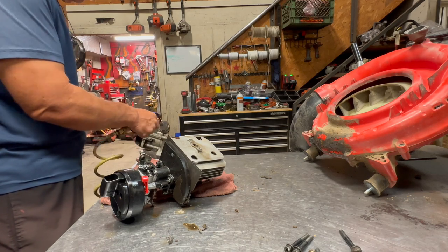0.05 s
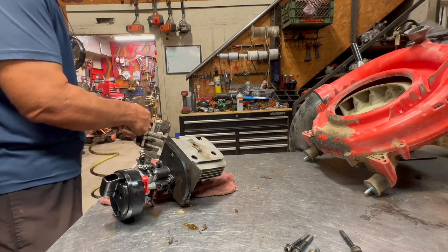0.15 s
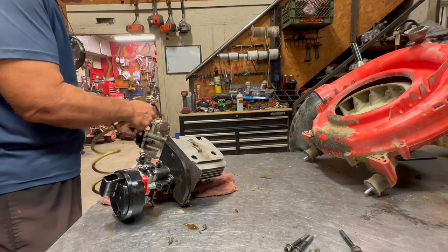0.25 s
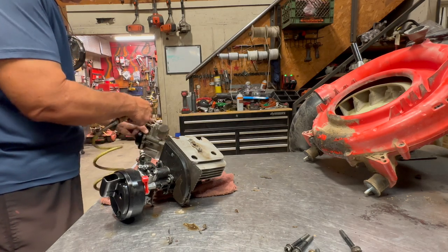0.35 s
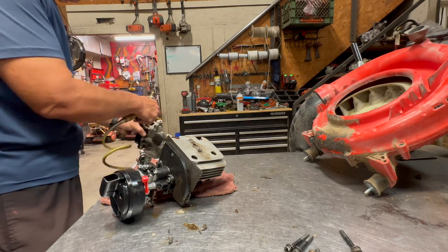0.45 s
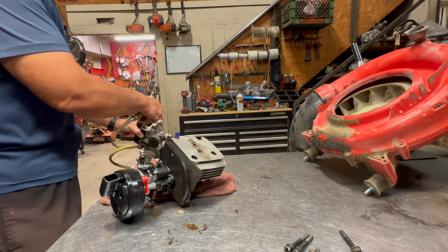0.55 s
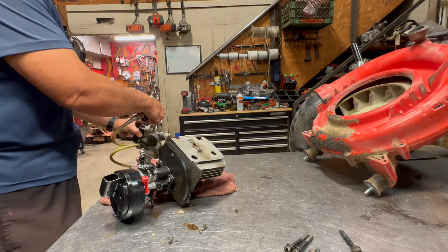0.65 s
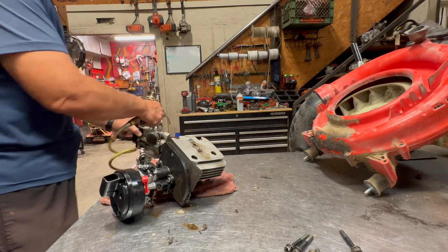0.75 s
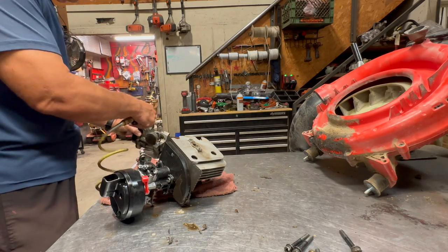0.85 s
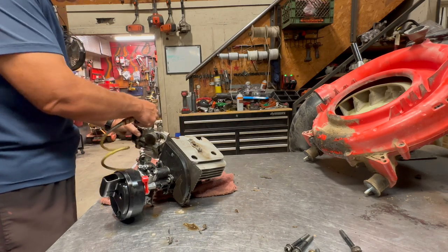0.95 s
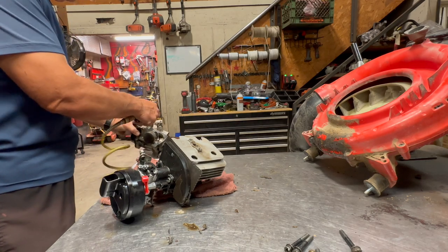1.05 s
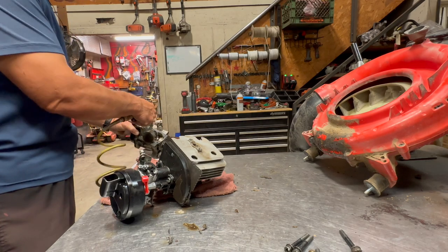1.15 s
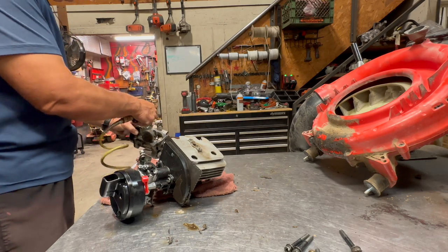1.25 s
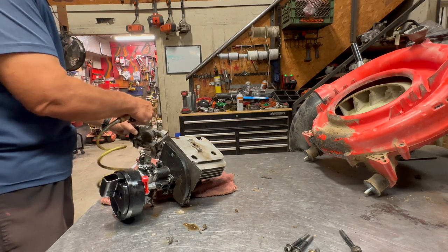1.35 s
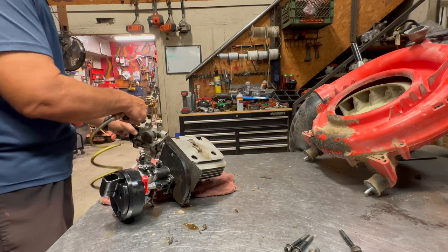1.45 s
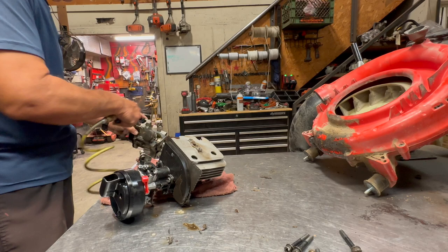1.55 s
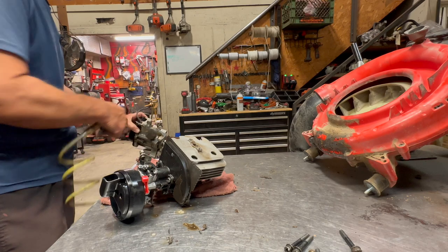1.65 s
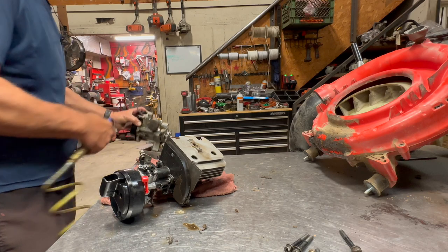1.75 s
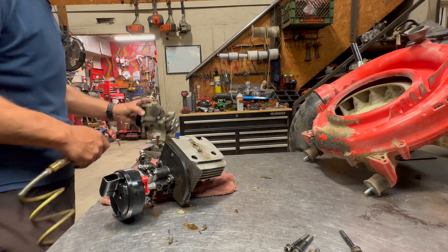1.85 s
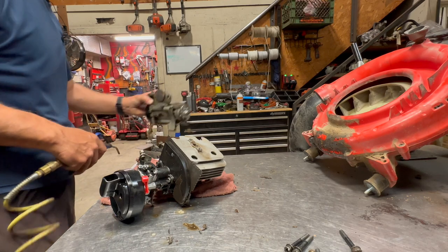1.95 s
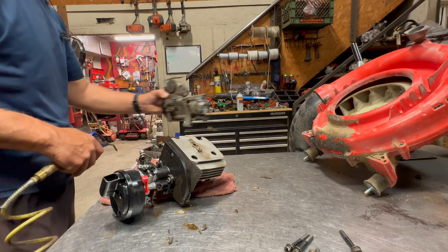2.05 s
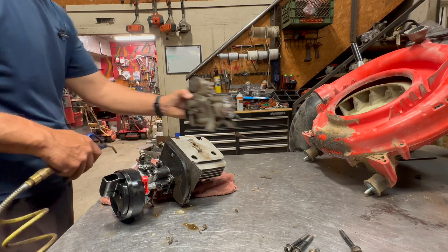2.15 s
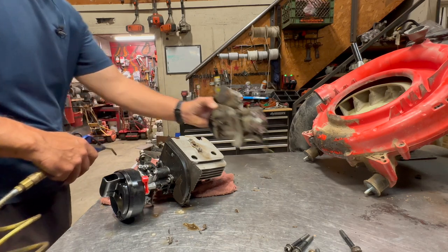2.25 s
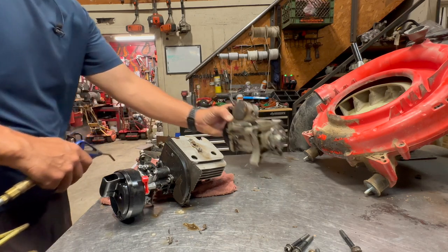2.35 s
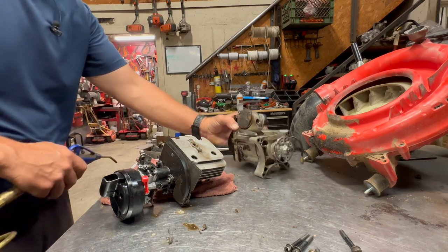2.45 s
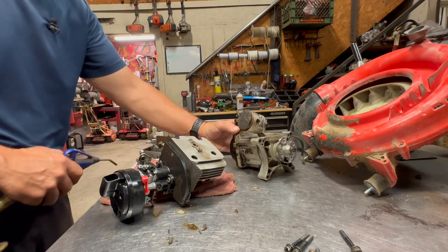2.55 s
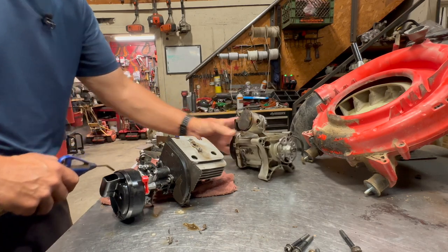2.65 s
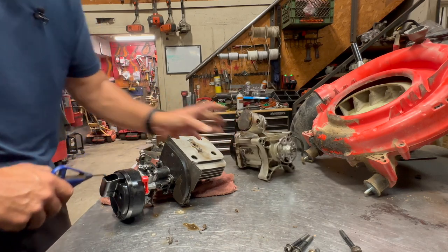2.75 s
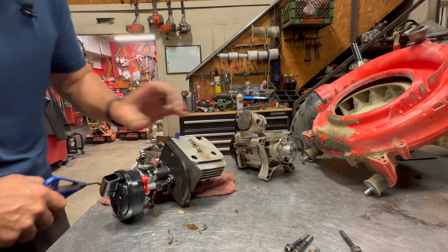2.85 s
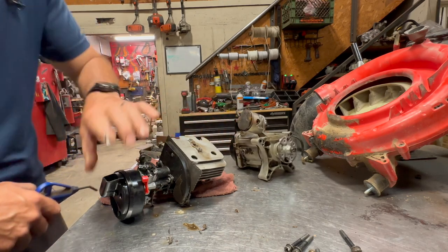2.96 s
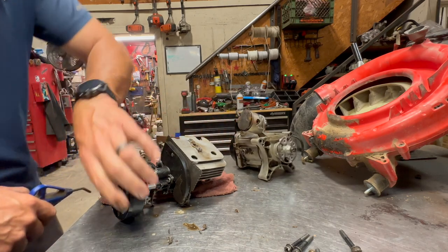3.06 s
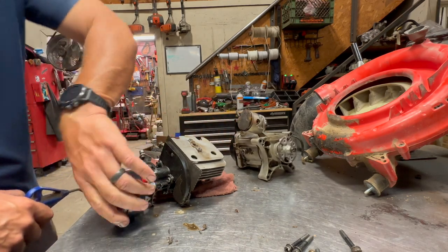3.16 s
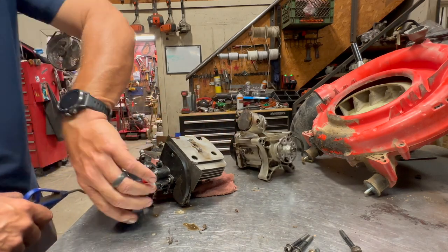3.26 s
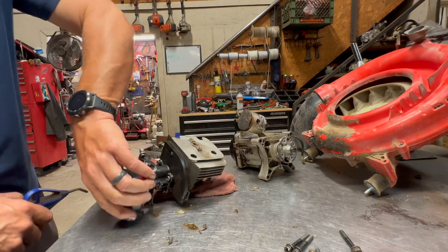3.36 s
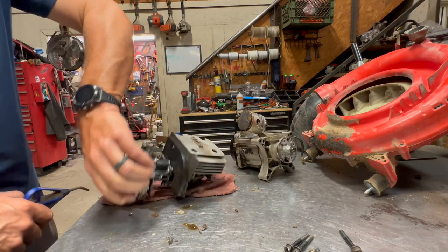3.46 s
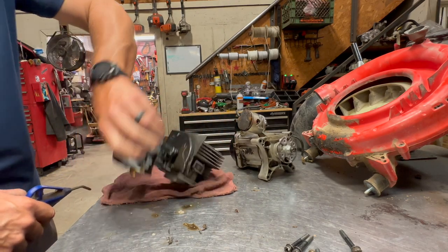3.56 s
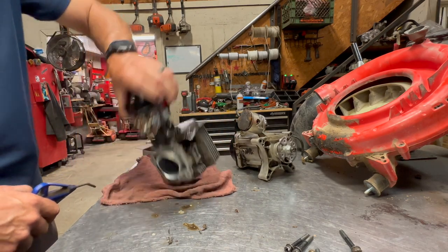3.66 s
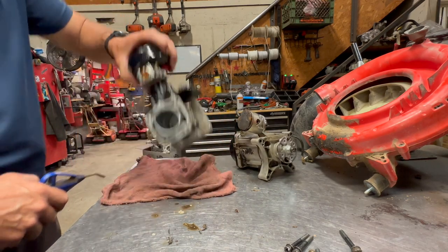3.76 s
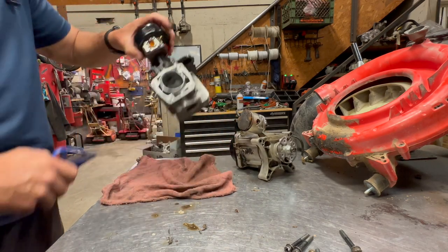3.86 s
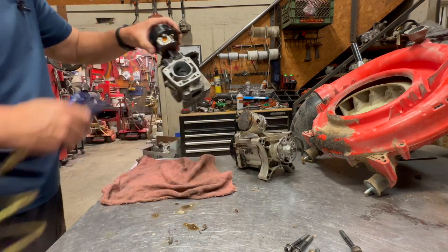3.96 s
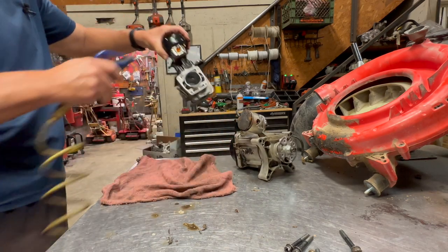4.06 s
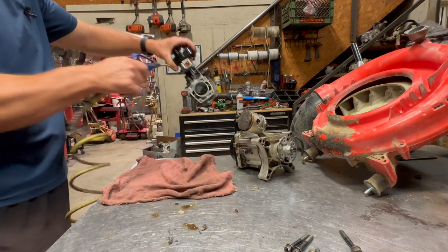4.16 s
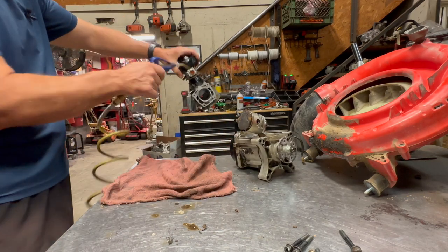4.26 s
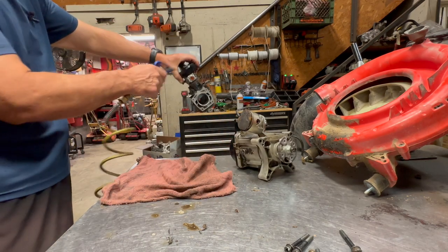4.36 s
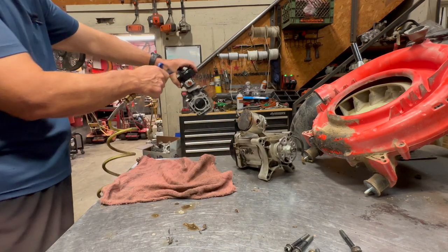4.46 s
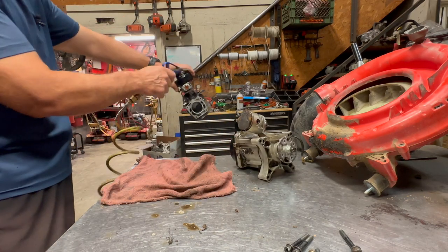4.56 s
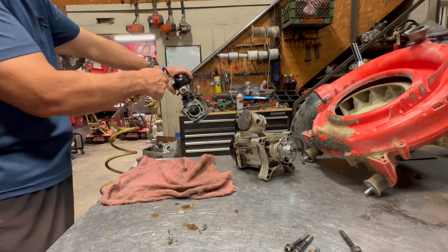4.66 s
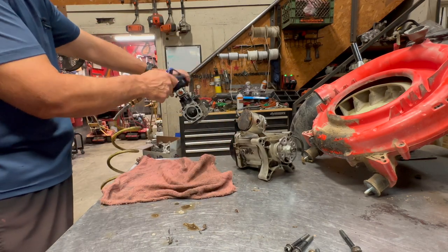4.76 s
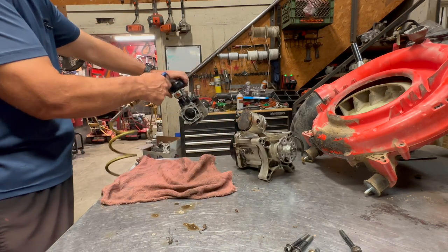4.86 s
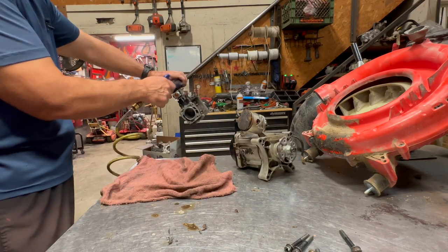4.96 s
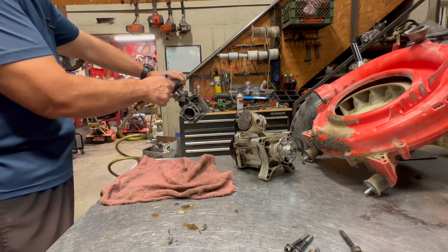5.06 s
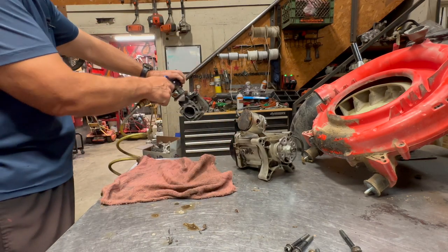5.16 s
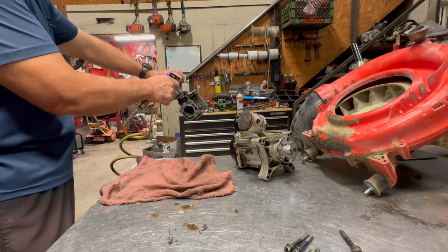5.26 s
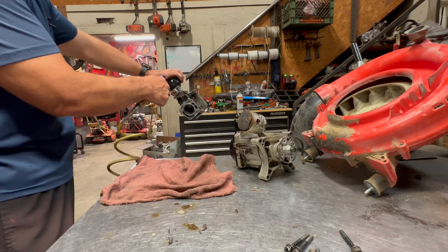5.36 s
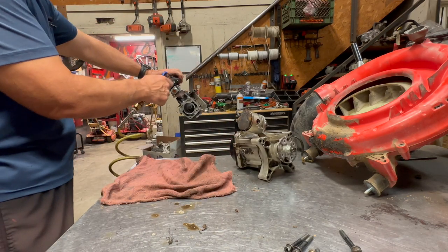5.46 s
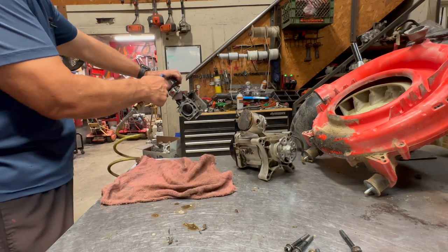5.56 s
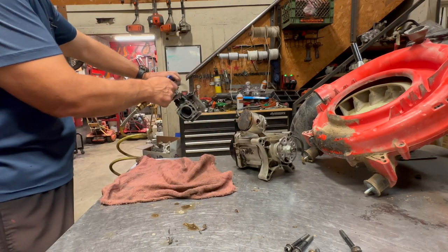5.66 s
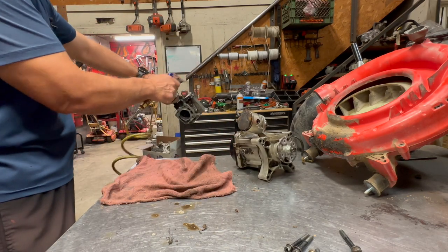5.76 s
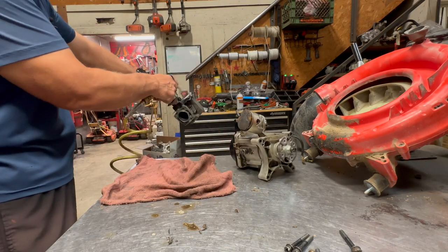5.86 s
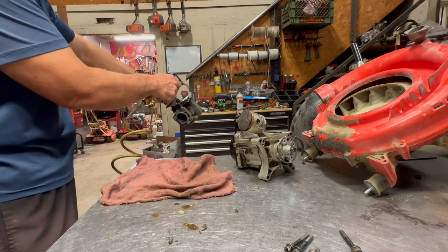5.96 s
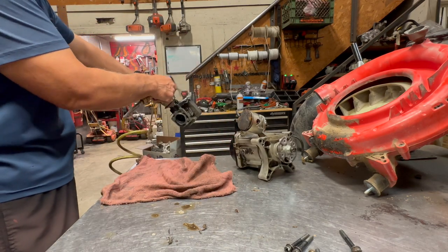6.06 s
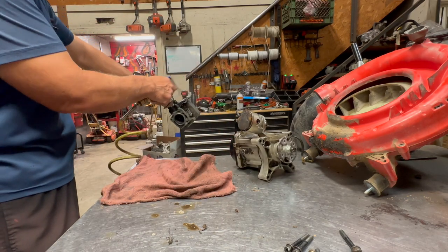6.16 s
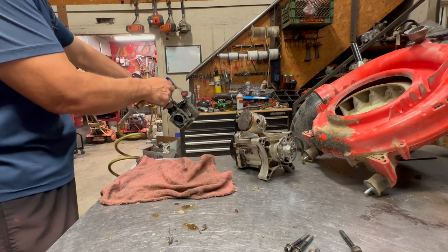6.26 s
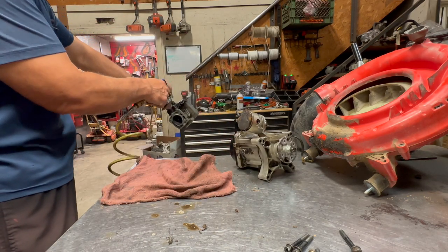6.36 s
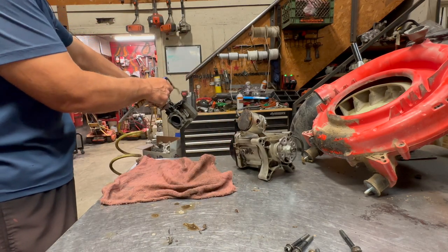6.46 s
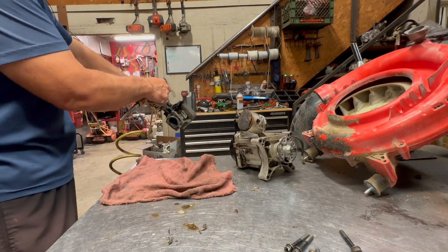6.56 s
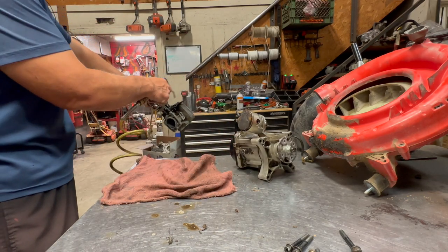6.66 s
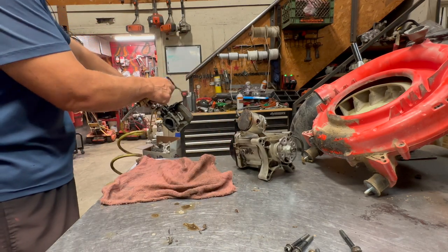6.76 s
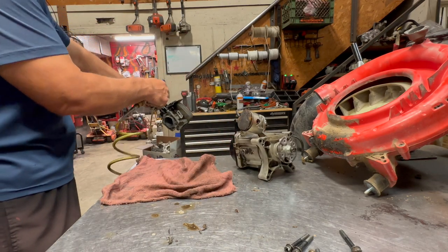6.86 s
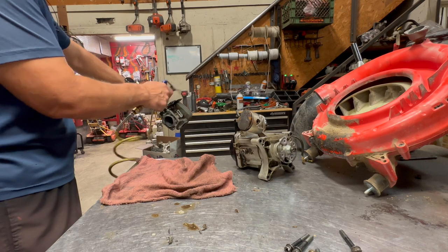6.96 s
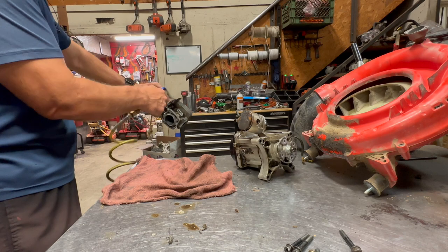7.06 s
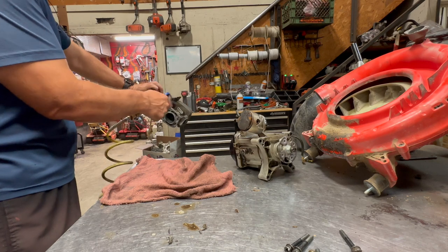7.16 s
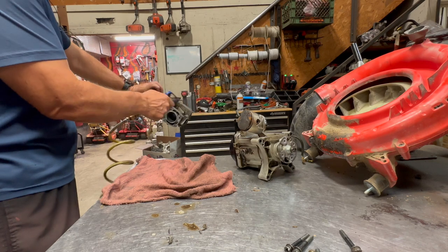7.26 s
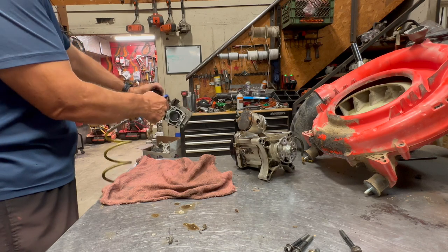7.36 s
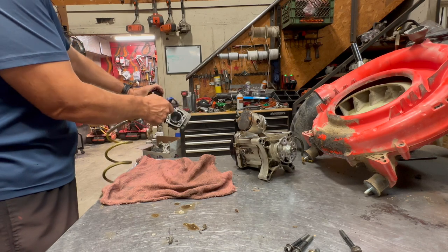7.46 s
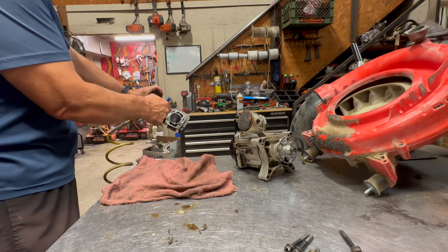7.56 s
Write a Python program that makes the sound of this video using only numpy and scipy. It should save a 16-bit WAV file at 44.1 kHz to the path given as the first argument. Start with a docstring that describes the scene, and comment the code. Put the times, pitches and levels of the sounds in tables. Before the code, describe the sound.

A harsh, bright compressed-air blast is already on at 0 seconds, close and loud enough to overload the mono microphone. The jet is led slowly over a metal engine part, hissing on edges, dipping briefly near 0.3, roaring in hollows and catching short breathy notes. At 1.7 the gun's valve snaps shut with a small hollow tick, and a short workshop echo fades. A quiet piston compressor throbs and hums beneath soft room rush, its drone swelling slightly around 2.4 to 4. At about 2.46 a heavy casting knocks onto a steel bench: a quick cluster of dull, clanking contacts with brief ringing, a fainter last tap near 2.7. At 4.18 the second blast bursts on, swinging to and fro roughly six times a second, roar alternating with ringing hiss. A rim sings pulsingly around 6, and breathy notes dot the blast, which continues to the end at about 7.6.

```python
"""A compressed-air blow gun dries two engine parts in a workshop, over a compressor's throb and the room's rush.
The first blast is already on: shaped noise hisses, rings on edges and roars in hollows as the jet is led slowly
over the part. The gun's valve snaps shut with a tick; then the part knocks onto a steel bench, made of fading
bench tones and noise. In the second blast, which lasts to the end, the jet swings quickly to and fro: roar and
ring take turns and a rim sings. Short breathy notes dot both blasts, which overload the mono microphone."""
import sys
import numpy as np
from scipy import signal
from scipy.fft import rfft, irfft, next_fast_len
from scipy.io import wavfile
from scipy.ndimage import uniform_filter1d, map_coordinates

SR = 44100
rng = np.random.default_rng(int(sys.argv[2]) if len(sys.argv) > 2 else 0)


def transcribe(u):
    """Save the signal u as a 16-bit wav file named by the first command-line argument.

    u: samples, shape (n,) or (channels, n), limited to [-1, 1]; the rate is SR.
    q: integer samples, one column per channel.
    """
    v = np.clip(np.atleast_2d(u).T, -1, 1)
    q = np.round(v * 32767).astype(np.int16)
    wavfile.write(sys.argv[1], SR, q)


N = 335601  # length of the scene [samples]

# Levels in the tables are relative: the functions scale them further.
# rush of the room: (frequency [Hz], level per Hz [dB])
ROOM_RUSH = [(20, 0), (48, -1), (64, 2), (130, -1), (180, -3), (300, 0), (700, -6), (2200, -8),
             (3400, -9.5), (4300, -11), (5600, -12), (6300, -19), (10700, -27), (11600, -30.5),
             (15500, -37)]
# how long the workshop's echo lasts: (frequency [Hz], time to fade by 60 dB [s])
ROOM_FADE = [(200, .4), (2000, .42), (6000, .38), (14000, .27)]
# compressor intake: (time [s], drone [dB], throb once a turn [dB], throb twice a turn [dB])
INTAKE_LEVELS = [(1.2, -42, -2, -14), (1.9, -42, -4, -8), (2.15, -40, -1, -10), (2.35, -35, -4, -11),
                 (2.85, -33, -8, -16), (3.25, -35, -13, -5), (4.1, -36.5, -9, -5.5), (4.4, -44.5, -14, -9)]
# the pump's other tones: (multiple of the shaft rate [1], level [dB])
SHAFT_TONES = [(4, -51), (8, -56.5), (13, -57), (14, -50), (15, -53), (22, -62), (29, -51), (31, -58),
               (36, -52.5), (38, -53), (39, -52.5), (54, -56.5), (58, -56.5), (93, -53), (95, -53),
               (103, -56), (111, -58.5), (113, -53), (170, -54)]
# hum of the motor: (frequency [Hz], level [dB])
MOTOR_HUM = [(119.8, -52), (239.7, -65)]
# colour of the valve chatter: (frequency [Hz], full width at half height [Hz], level [dB])
VALVE_BANDS = [(630, 130, 1), (1560, 210, 11.5), (1830, 200, 3), (2760, 120, 12), (3320, 450, 4),
               (10550, 700, -15)]
# the casting lands, rocks on the bench and settles as it is let go:
# (time [s], level [dB], extra level of the crack [dB])
BENCH_CONTACTS = [(2.4614, -4, -2), (2.4716, -9.5, 1), (2.4973, -9.5, -4), (2.505, -19, -2),
                  (2.514, -21.5, 2), (2.527, -18, -11), (2.5574, -16.5, -4), (2.688, -31, -6)]
# ringing of bench top and casting: (frequency [Hz], level [dB], time to fade by 60 dB [s])
BENCH_TONES = [(172, -12, 0.28), (236, -1.5, 0.26), (320, -9, 0.13), (399, -5.5, 0.32), (450, -7, 0.26),
               (582, 5, .11), (732, -7, .18), (840, -7, .13), (930, 0, .11), (1014, -6, .14),
               (1060, -1, 0.091), (1255, -10, .12), (1572, -11, .16), (2010, 0, 0.056), (2330, -1.5, 0.089),
               (2697, -24, 0.11)]
# dull part of a contact: (frequency [Hz], level per Hz [dB])
THUD_COLOUR = [(40, -25), (130, -16), (250, 2), (600, 4), (1100, 0.5), (1800, -14), (4000, -45)]
# bright part of a contact: (frequency [Hz], level per Hz [dB])
CRACK_COLOUR = [(300, -28), (1200, 1.5), (2800, 1), (4000, -8.5), (6500, -17), (8500, -24), (15500, -34)]
# tones of the valve snapping shut: (frequency [Hz], level [dB], time to fade by 60 dB [s])
POP_TONES = [(1280, -1, .012), (1720, -1, .014)]
# openings and edges the jet can sound: name: (frequency [Hz], half width at half height [Hz])
OPENING_NOTES = {"throat": (1090, 150), "passage": (3380, 180), "slit": (6330, 290), "lip": (14150, 1300),
                 "bore": (890, 126), "port": (1720, 260), "recess": (2310, 510), "fins": (3900, 290)}
# the jet briefly catches one of them: (time [s], length [s], opening [name], level [dB])
CATCH_TIMES = [(.28, .043, "lip", -17), (0.44, 0.064, "throat", -11), (0.49, 0.038, "throat", -6.5),
               (0.604, .06, "passage", -12), (.728, .059, "passage", -15), (0.92, .057, "throat", -9),
               (.975, 0.071, "passage", -10), (1.27, .091, "lip", -12), (1.392, .045, "passage", -8),
               (1.50, .033, "slit", -10), (1.532, 0.051, "throat", -13), (4.209, .043, "recess", -9),
               (4.258, 0.076, "bore", -10.5), (4.322, 0.032, "fins", -9), (4.353, 0.042, "lip", -7),
               (4.5, 0.081, "fins", -9.5), (4.528, 0.029, "port", -13.5), (4.606, .067, "port", -15.5),
               (5.992, 0.054, "recess", -13), (6.82, 0.078, "recess", -11), (6.99, 0.15, "recess", -13),
               (7.121, 0.076, "bore", -18.5), (7.19, 0.027, "fins", -13), (7.294, 0.028, "fins", -9),
               (7.405, 0.071, "slit", -14), (7.527, 0.029, "bore", -10.5)]
# the second part's rim, grazed at the far end of each swing:
# (frequency [Hz], half width at half height [Hz])
RIM_NOTE = (4920, 450)
# the swings come closest to the rim: (time [s], length [s], level [dB])
RIM_APPROACH = (6.07, 1.03, -11.5)
# when the trigger is held for the first part: (opens [s], closes [s])
FIRST_HOLD = (-.02, 1.702)
# when the trigger is held for the second part: (opens [s], closes [s])
SECOND_HOLD = (4.176, 8)
# air in the first part's hollows: (frequency [Hz], level per Hz [dB])
FIRST_HOLLOW_COLOUR = [(40, -9), (200, -15), (650, -6), (920, -3), (1080, 0.5), (1350, -1), (1750, -9),
                       (2100, -3), (2800, -4), (3350, 3), (3950, -2.5), (4600, -2), (6200, -35),
                       (15000, -42)]
# air on the first part's edges: (frequency [Hz], level per Hz [dB])
FIRST_EDGE_COLOUR = [(40, -17), (500, -7), (1000, -40), (1750, -4), (2300, -9.5), (3400, 2.5), (4100, -6.5),
                     (4900, 5.5), (5450, -2.5), (6250, 5.5), (7000, -5), (7550, 1.5), (10500, -8),
                     (15500, -22)]
# free air around the first part: (frequency [Hz], level per Hz [dB])
FIRST_JET_COLOUR = [(40, -22), (1000, -4.5), (4200, -17.5), (4850, -5), (5600, -4.5), (6400, 3), (7000, -1),
                    (7600, 2.5), (10000, -1), (15500, 0.5)]
# air in the second part's hollows: (frequency [Hz], level per Hz [dB])
SECOND_HOLLOW_COLOUR = [(40, -23), (200, -11.5), (500, -3.5), (900, 1.5), (1200, -1.5), (2250, 1.5),
                        (3200, -1.5), (3750, 5), (4300, -5), (4900, -17), (15000, -15.5)]
# air on the second part's edges: (frequency [Hz], level per Hz [dB])
SECOND_EDGE_COLOUR = [(40, -12), (900, -17), (1800, -11.5), (2400, -6.5), (2800, -7), (3200, 3),
                      (3750, 1.5), (4150, -8.5), (4600, 1.5), (5150, -1), (5800, -8.5), (6500, -5.5),
                      (8000, -10), (15500, -33)]
# free air around the second part: (frequency [Hz], level per Hz [dB])
SECOND_JET_COLOUR = [(40, -6), (1100, -10), (1650, -2), (2400, -28), (3200, -19.5), (4000, -22), (4600, 1),
                     (6000, -1), (6550, 0), (7200, -3.5), (9000, -0.5), (11300, 3), (12800, 2.5),
                     (15500, 0.5)]
# how squarely the jet lies on the first part: (time [s], level [dB])
FIRST_AIM_LEVELS = [(0.0, -0.5), (.23, -0.5), (.288, -10), (.325, 1.5), (.9, 1.5), (1.12, -1.5), (1.27, -3),
                    (1.4, 0), (1.53, -0.5), (1.68, -9.5)]
# the nozzle passes over a hollow of the first part: (time [s], length [s], level [dB])
HOLLOW_PASSES = [(0.244, 0.016, -14), (0.324, 0.017, -11), (0.455, 0.069, -6), (0.603, 0.076, -10),
                 (.752, 0.037, -10), (0.814, 0.048, -9), (0.942, .08, -8), (1.404, 0.053, -8),
                 (1.524, 0.032, -11.5)]
# the middle of the swing drifts over the second part:
# (time [s], air in the hollows [dB], air on the edges [dB])
SECOND_AIM_LEVELS = [(4.2, -10, -20), (4.44, -13, -15), (4.8, -18, -17.5), (5.25, -16, -11.5),
                     (5.5, -20.5, -14), (5.8, -17, -14.5), (6.1, -17.5, -13), (6.5, -20.5, -9.5),
                     (6.9, -12.5, -11.5), (7.25, -16, -13.5), (7.6, -15, -9)]
# width of the swing, as the rise and fall of the roar: (time [s], change either way [dB])
SWING_WIDTH = [(4.2, 0), (4.6, 5), (4.8, 2.5), (5.2, 3.5), (5.7, 6), (6.1, 6), (6.45, 2.5), (6.8, 6),
               (7.2, 2.5), (7.5, 5)]
# the jet slips off the second part: (time [s], length [s], change on the casting [dB])
SLIP_TIMES = [(4.359, 0.039, -6), (7.243, 0.036, -7), (7.411, 0.054, -11), (7.572, 0.034, -12)]

PUMP_HZ = 16.49  # turns of the pump shaft per second
TOP_HZ = 15750  # nothing is kept above this
POP_S, POP_DB = 1.6983, -4  # the gun's valve snaps shut
# the hand swings the nozzle to and fro over the second part, slowly gaining speed
SWING_START_S, SWING_HZ, SWING_GAIN_HZ_PER_S = 4.26, 5.55, 0.24


def amp(db):
    """Turn decibels into gain."""
    return 10 ** (np.asarray(db) / 20)


def unit(x):
    """Scale to an average (rms) strength of 1."""
    return x / np.sqrt(np.mean(x ** 2) + 1e-20)


def clock():
    """Give the time of every sample in seconds."""
    return np.arange(N) / SR


def along(points, hz):
    """Read a curve of (frequency, value) points on a log frequency axis."""
    point_hz, values = np.transpose(points)
    return np.interp(np.log(hz + 1), np.log(point_hz), values)


def curves(rows):
    """Draw one value per sample for each column after the time."""
    times, *columns = np.transpose(rows)
    return [np.interp(clock(), times, column) for column in columns]


def wobble(rate):
    """Draw a smooth random curve through this many random points a second."""
    points = rng.standard_normal(int(N * rate / SR) + 4)
    return map_coordinates(points, [clock() * rate])


def swell(s, length):
    """Rise and fall smoothly around time s; length spans the points at 1/e of the peak."""
    return np.exp(-np.minimum((2 * (clock() - s) / length) ** 2, 60))


def filtered(x, response):
    """Shape the sound x by a response that depends on frequency."""
    size = next_fast_len(len(x) + 8192)
    hz = np.fft.rfftfreq(size, 1 / SR)
    return irfft(rfft(x, size) * response(hz), size)[:len(x)]


def noise(spectrum, size=N):
    """Make noise of a given colour, scaled to rms 1."""
    white = rng.standard_normal(size)
    return unit(filtered(white, lambda hz: amp(along(spectrum, hz))))


def resonance(f, hz, width):
    """Respond most strongly at one frequency, as a damped vibration does."""
    return 1j * f * width / (hz * hz - f * f + 1j * f * width)


def shop(x):
    """The workshop's echo is fading noise whose treble dies first."""
    hz, t, z = signal.stft(rng.standard_normal(SR // 2), SR, nperseg=256)
    fade = amp(-60 * t / along(ROOM_FADE, hz)[:, None])
    tail = signal.istft(z * fade, SR, nperseg=256)[1]
    delayed = np.pad(tail, (200, 0))  # the echo starts 200 samples late
    return signal.fftconvolve(x, delayed / np.linalg.norm(tail))[:N]


def compressor(valve_db=-45.0, stroke_db=0.5, waver_db=3.5):
    """A piston pump: a throbbing intake drone, shaft tones, valve chatter on each stroke and motor hum."""
    t = clock()
    turn = 2 * np.pi * (PUMP_HZ * t + 0.0034 * wobble(3))  # shaft angle, slightly unsteady

    def tone(phase):
        """A sine of rms 1 from a random starting point."""
        return np.sqrt(2) * np.sin(phase + rng.uniform(0, 2 * np.pi))

    drone_db, once_db, twice_db = curves(INTAKE_LEVELS)
    # neighbouring tones beat against the 18th, once and twice a turn
    throb = amp(once_db) * tone(19 * turn) + amp(twice_db) * tone(20 * turn)
    drone = amp(drone_db) * (tone(18 * turn) + throb)
    shaft = sum(amp(db + waver_db * wobble(4.35)) * tone(round(order) * turn) for order, db in SHAFT_TONES)

    def valve_colour(f):
        """The valves favour a few bands."""
        return sum(amp(db) * np.abs(resonance(f, hz, width)) ** 2 for hz, width, db in VALVE_BANDS)

    strokes = rng.standard_normal(N) * amp(stroke_db * np.cos(2 * turn))  # two strokes a turn
    chatter = filtered(strokes, valve_colour)
    hum = sum(amp(db) * tone(2 * np.pi * hz * t) for hz, db in MOTOR_HUM)
    return drone + shaft + amp(valve_db) * unit(chatter) + hum


def set_down(ring_db=-6, thud_t60=0.063, crack_db=-2.0, crack_t60=0.079):
    """Each contact thuds, cracks and rings the steel bench top; t60 is the time [s] to fade by 60 dB."""
    out = np.zeros(N)
    t = np.arange(SR // 2) / SR
    for s, db, hard_db in BENCH_CONTACTS:
        ring = 0
        for hz, level, t60 in BENCH_TONES:
            fade = amp(level + 2 * rng.normal() - 60 * t / t60)  # each hit differs a little
            ring = ring + fade * np.sin(2 * np.pi * hz * t) * rng.choice([-1, 1])
        thud = noise(THUD_COLOUR, size=len(t)) * amp(-60 * t / thud_t60)
        crack = noise(CRACK_COLOUR, size=len(t)) * amp(crack_db + hard_db - 60 * t / crack_t60)
        out[round(s * SR):][:len(t)] += amp(db) * (amp(ring_db) * ring / 2 + thud + crack)
    return out


def valve_pop(attack=0.0006):
    """A short hollow tick as the trigger is let go: two fading tones; attack in seconds."""
    t = np.maximum(clock() - POP_S, 0)
    ring = sum(amp(db - 60 * t / t60) * np.sin(2 * np.pi * hz * t) for hz, db, t60 in POP_TONES)
    return amp(POP_DB) * (1 - np.exp(-t / attack)) * ring


def note(hz, width):
    """Air across an opening gives a breathy note: noise narrowed around one frequency, rms 1."""
    return unit(filtered(rng.standard_normal(N), lambda f: resonance(f, hz, 2 * width) ** 2))


def catches():
    """Air across an opening swells into a breathy note and leaves it again."""
    notes = {name: note(hz, width) for name, (hz, width) in OPENING_NOTES.items()}
    return sum(amp(db) * swell(s, length) * notes[name] for s, length, name, db in CATCH_TIMES)


def swing():
    """Place of the nozzle over the second part: 1 over the hollows, -1 at the rim."""
    t = clock() - SWING_START_S
    return np.cos(2 * np.pi * (SWING_HZ * t + SWING_GAIN_HZ_PER_S * t ** 2 / 2))


def rim(sharpness=2.2):
    """The rim sings once on every swing, loudest while the hand is closest to it."""
    s, length, db = RIM_APPROACH
    graze = np.clip((1 - swing()) / 2, 0, 1) ** sharpness
    after_opening = clock() > SECOND_HOLD[0]
    return amp(db) * swell(s, length) * graze * note(*RIM_NOTE) * after_opening


def first_shares(hollow_db=-17.5, edge_db=-9.0, jet_db=-14.0, spill=0.4, steal=2.1, tremor_db=2.7):
    """A pass over a hollow takes air from the edges; what misses the part hisses freely."""
    aim_db, = curves(FIRST_AIM_LEVELS)
    passes = sum(amp(db) * swell(s, length) for s, length, db in HOLLOW_PASSES)
    hollow = amp(hollow_db + aim_db + tremor_db * wobble(21.9)) + passes
    edge = amp(edge_db + aim_db + tremor_db * wobble(21.97)) / (1 + steal * passes)
    jet = amp(jet_db - spill * aim_db)
    return hollow, edge, jet


def second_shares(jet_db=-10.5, edge_swing=0.67, jet_swing=0.24, midway_db=2.0, hollow_tremor_db=2.0,
                  edge_tremor_db=2.0, jet_tremor_db=0.85, spill=0.27):
    """Roar and ring take turns on each swing, and the hiss gets a lift midway between them."""
    hollow_db, edge_db = curves(SECOND_AIM_LEVELS)
    place = swing()
    swing_db = curves(SWING_WIDTH)[0] * place
    slip_db = sum(db * swell(s, length) for s, length, db in SLIP_TIMES)
    midway_lift_db = midway_db * (.5 - place ** 2)
    hollow = amp(hollow_db + swing_db + slip_db + hollow_tremor_db * wobble(25))
    edge = amp(edge_db - edge_swing * swing_db + slip_db + edge_tremor_db * wobble(25))
    jet = amp(jet_db - jet_swing * swing_db - spill * slip_db + midway_lift_db + jet_tremor_db * wobble(22))
    return hollow, edge, jet


def patchy(x, depth_db, above_hz=700):
    """The moving nozzle keeps lifting and sinking stretches of the spectrum; the bass is spared."""
    hz, _, z = signal.stft(x, SR, nperseg=512)
    field = rng.standard_normal(z.shape)
    for _ in range(2):  # blur over frequency, then over time
        field = uniform_filter1d(field, size=4, axis=0)
        field = uniform_filter1d(field, size=6, axis=1)
    reach = (hz / (hz + above_hz))[:, None]
    patched = z * amp(depth_db * reach * unit(field))
    return unit(signal.istft(patched, nperseg=512)[1][:N])


def blast(shares, colours, opens, closes, attack=0.012, release=0.015, flutter_db=3.0,
          surface_patch_db=2.5, jet_patch_db=3.0):
    """While the trigger is held, the aim shares the air between hollows, edges and the free jet."""
    t = clock()
    # attack and release are in seconds
    trigger = np.clip((t - opens) / attack, 0, 1) * np.clip((closes - t) / release, 0, 1)
    depths = [surface_patch_db, surface_patch_db, jet_patch_db]
    hollow, edge, jet = [share * patchy(noise(colour), depth)
                         for share, colour, depth in zip(shares, colours, depths)]
    # the flow over the casting is unsteady; the free jet has no such flutter
    hollow = hollow * amp(flutter_db * wobble(90))
    edge = edge * amp(flutter_db * wobble(70))
    return trigger * (hollow + edge + jet)


def scene():
    """Two blasts and the knock between them, over the compressor and the room's rush."""
    first_colours = [FIRST_HOLLOW_COLOUR, FIRST_EDGE_COLOUR, FIRST_JET_COLOUR]
    second_colours = [SECOND_HOLLOW_COLOUR, SECOND_EDGE_COLOUR, SECOND_JET_COLOUR]
    first = blast(first_shares(), first_colours, *FIRST_HOLD)
    second = blast(second_shares(), second_colours, *SECOND_HOLD)
    air = amp(0.24) * (first + second + catches() + rim())
    knocks = set_down() + valve_pop()
    room = shop(amp(-10.5) * air + amp(-13.0) * knocks)
    rush = amp(-37.5) * noise(ROOM_RUSH)
    mono = air + knocks + room + compressor() + rush
    return np.array([mono, mono])


def band_limit(hz):
    """Pass everything from the deep bass up to a steep top edge."""
    bass_cut = hz ** 4 / (hz ** 4 + 22 ** 4)
    return bass_cut / (1 + (hz / TOP_HZ) ** 300)


def record(dry, ceiling=0.41, hardness=6):
    """The microphone's input flattens the peaks; nothing is kept above the band limit."""
    clipped = dry / (1 + np.abs(dry / ceiling) ** hardness) ** (1 / hardness)
    return np.array([filtered(side, band_limit) for side in clipped])


dry = scene()
out = record(dry)
transcribe(out)
```